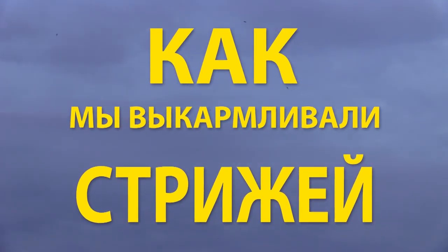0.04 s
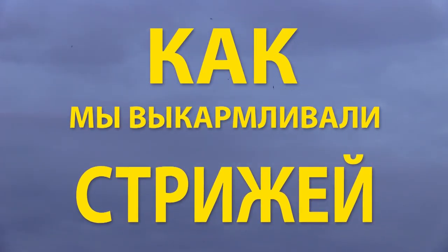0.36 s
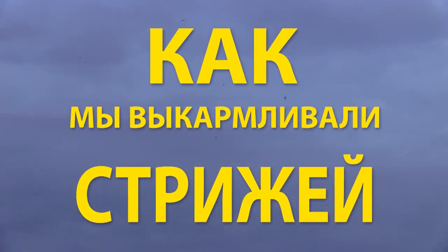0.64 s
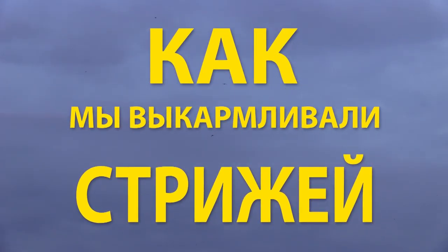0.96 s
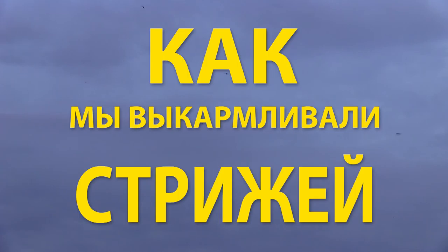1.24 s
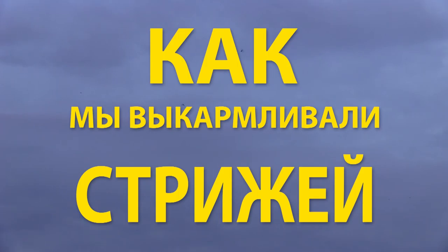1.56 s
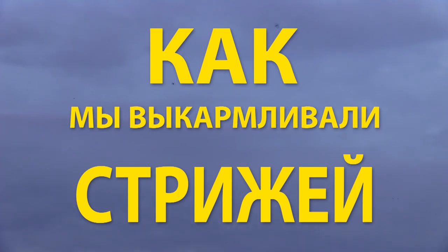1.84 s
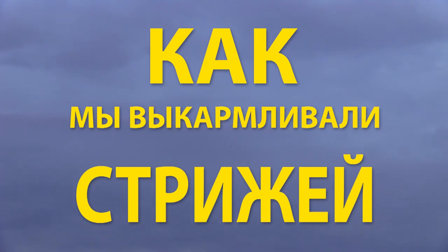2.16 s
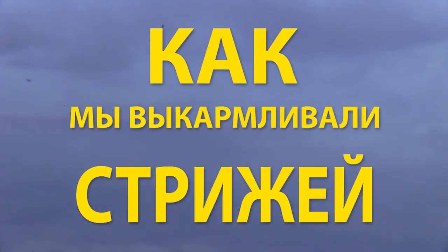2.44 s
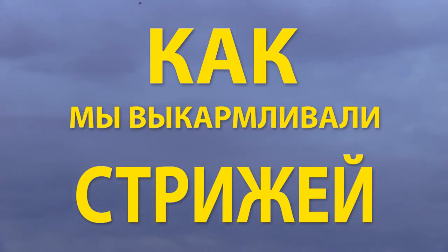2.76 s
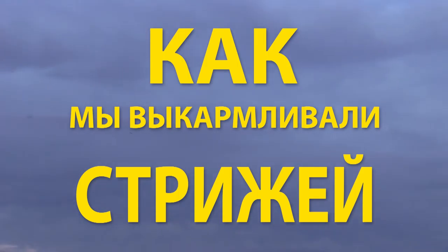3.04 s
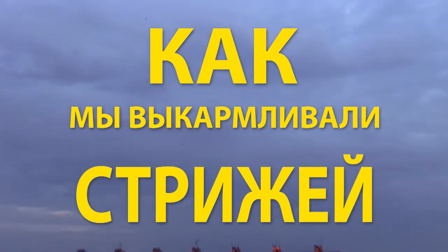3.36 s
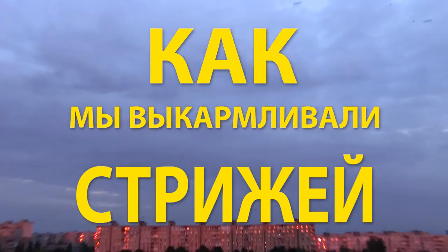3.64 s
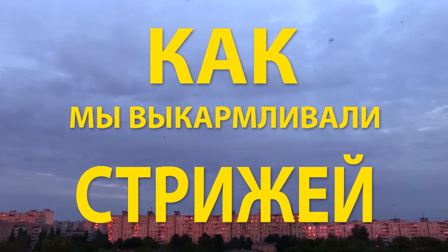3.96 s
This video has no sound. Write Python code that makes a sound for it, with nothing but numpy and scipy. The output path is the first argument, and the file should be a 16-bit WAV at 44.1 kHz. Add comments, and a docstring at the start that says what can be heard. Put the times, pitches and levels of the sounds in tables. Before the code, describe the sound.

Swifts scream overhead throughout, their shrill whistles sliding up and breaking into buzzes and quick trills, lightly echoed by houses. The loudest calls come between 0.5 and 1.3 seconds; fainter ones follow, swelling again around 3 seconds. Distant traffic rumbles underneath, with faint hiss and slowly growing wind on the microphone. The camera clicks once at the start and twice near 3.7 to 3.8 seconds.

```python
"""Swifts over a town at dusk

Swifts chase each other, heard from a hand-held camera high on a house. Each scream slides up to
a shrill whistle and breaks into a buzz; many end in a trill of short notes. House walls echo the birds.
Distant traffic rumbles, air brushes the faintly hissing microphones and the camera clicks three times."""
import sys
import numpy as np
from scipy import signal
from scipy.fft import rfft, irfft
from scipy.io import wavfile
from scipy.ndimage import uniform_filter1d

SR = 44100
rng = np.random.default_rng(int(sys.argv[2]) if len(sys.argv) > 2 else 0)


def generate_wav(signal):
    """Clip the signal to [-1, 1] and save it as 16-bit WAV at the path in sys.argv[1]."""
    frames = np.transpose(np.atleast_2d(signal))
    scaled = np.clip(frames, -1, 1) * 32767
    pcm = np.round(scaled).astype(np.int16)
    wavfile.write(sys.argv[1], SR, pcm)


N = 176400
SIDES = np.array([[1], [-1]])  # adds to the left channel, takes from the right


def undb(db):
    """Turn decibels into a number to multiply by."""
    return 10 ** (np.asarray(db) / 20)


def wander(rate_hz, size):
    """A smooth random drift with a spread of 1; a higher rate drifts faster."""
    width = max(2, int(SR / rate_hz))
    drift = rng.standard_normal(N + size)
    for _ in range(2):
        drift = uniform_filter1d(drift, width, mode="wrap")
    return drift[:size] / drift.std()


def noise(spectrum):
    """Noise with a spread of 1, shaped by (frequency [Hz], level [dB]) points and fading above the last."""
    hz, db = np.array(spectrum, float).T
    freqs = np.maximum(np.arange(N // 2 + 1) * SR / N, 1)
    gain = undb(np.interp(np.log(freqs), np.log(hz), db)) * np.minimum(1, hz[-1] / freqs) ** 2
    shaped = irfft(rfft(rng.standard_normal(N)) * gain, N)
    return shaped / shaped.std()


def add(out, start, sound):
    """Mix a sound in at its start time, in seconds."""
    i = max(0, int(start * SR))
    n = min(sound.shape[-1], N - i)
    out[..., i:i + n] += sound[..., :n]


def traffic():
    """Distant traffic blends into a low rumble that gently swells and sinks."""
    # the rumble both ears share (frequency [Hz], level [dB])
    shared = [(25, -5), (50, -7), (85, -9), (115, -0.5), (146, -1.5), (170, -7.5), (225, -7), (275, -5.5),
              (320, -11.5), (560, -11), (700, -16), (1300, -22), (2500, -31), (3500, -37.5)]
    # the part that differs between the ears (frequency [Hz], level [dB])
    spread = [(40, -18), (150, -5.5), (560, -0.5), (1300, -7.5), (3500, -20.5)]
    rumble = undb(-41) * noise(shared) + undb(-52) * SIDES * noise(spread)
    return rumble * undb(wander(1.09, N))


def wind():
    """Slowly growing gusts brush the two microphones and push them partly in opposite directions."""
    # air buffeting a microphone (frequency [Hz], level [dB])
    buffeting = [(12, 0.5), (65, -2.5), (110, -18), (250, -23), (1000, -47)]
    growth_db_per_s, gust_db = 2, 3
    db = -43.5 + growth_db_per_s * np.arange(N) / SR
    gusts = np.array([noise(buffeting) * undb(db + gust_db * wander(11, N)) for _ in range(2)])
    return gusts - 0.2 * gusts[::-1]


def microphone_hiss():
    """The microphones make a faint, steady hiss of their own."""
    # tone of the hiss (frequency [Hz], level [dB])
    hiss = [(2000, -16.5), (3500, -8), (5600, -2.5), (7600, -14), (8500, -4), (9800, 2.5), (11000, -4),
            (12500, -14.5), (15500, -16.5)]
    return undb(-52.5) * (noise(hiss) + 0.41 * SIDES * noise(hiss))


def whistle(hz, loudness, octave_db):
    """A bird's voice box sings a tone with two overtones. Returns the sound and its loudness curve."""
    phase = 2 * np.pi * np.cumsum(hz) / SR
    roughness = 2 * np.pi * np.cumsum(260 * wander(1410, len(hz))) / SR
    overtones = np.sin(2 * phase) + undb(-15.5) * np.sin(1.5 * phase + roughness)
    tone = np.sin(phase) + undb(octave_db) * overtones
    return np.array([np.sqrt(2) * loudness * tone, loudness])


def trills():
    """Each short note swells quickly, flicks on to its pitch and leaves a brief buzz."""
    # each trill: (flick starts above the pitch by [Hz], note length at 6 kHz [s], buzz level [dB]),
    # then its notes (time [s], relative level [dB], pitch [Hz])
    runs = [ ((730, 0.0058, -5.5), [(.0004, -16, 6394), (.0094, -16.5, 6510), (.0253, -21, 6130),
            (.0393, -18, 6370), (.0534, -16.5, 5950), (.0697, -28, 5740), (.0854, -22.5, 5610),
            (.1004, -33.5, 4900)]), ((400, 0.0048, 0.5), [(.8524, -27, 6200), (.8809, -25.5, 6330),
            (.9083, -25.5, 6270)]), ((420, .008, -11), [(.9418, -20.5, 5490), (.9544, -20.5, 5590),
            (.9692, -20, 5570), (.9824, -19, 5460), (.9974, -20.5, 5380), (1.0124, -22.5, 5270),
            (1.0291, -20.5, 5300), (1.0424, -23.5, 5020), (1.0584, -31, 4620)]), ((120, 0.0072, -3.5),
            [(1.2605, -18.5, 6190), (1.2885, -19, 6270), (1.3189, -21.5, 6190), (1.3485, -23.5, 5950)]),
            ((100, 0.014, -10), [(1.7874, -43, 5560), (1.8223, -41, 4890)]), ((170, 0.01, -2),
            [(2.4538, -38, 5530), (2.4824, -42, 5600), (2.5117, -35.5, 5190), (2.5404, -41, 4770)]),
            ((-450, 0.0061, -27), [(3.0915, -25, 5620), (3.116, -17.5, 5850), (3.143, -18, 5890),
            (3.1705, -23, 5640), (3.1995, -27, 5040)]), ((200, 0.009, -9), [(3.6364, -34, 4850),
            (3.6526, -32, 4990), (3.6656, -31, 5180), (3.6774, -34, 5310), (3.693, -32.5, 5150)]),
            ((700, 0.0064, -14), [(3.707, -40, 4020), (3.7209, -38, 3840), (3.7364, -42, 3700)])]
    # strength of the overtone an octave up (note pitch [Hz], level [dB])
    octaves = [(5000, -26), (5450, -8), (5800, -21.5), (6250, -8.5), (6700, -41)]
    rise_s, release_s, flick_s, rough_hz = 0.0019, 0.00038, 0.0015, 70.6
    buzz_hz, buzz_fade_s = 262, 0.017
    out, t = np.zeros((2, N)), np.arange(SR // 20) / SR
    swell = np.sin(np.pi / 2 * np.minimum(t / rise_s, 1)) ** 2
    for (flick, length, buzz_db), notes in runs:
        for start, db, pitch in notes:
            after = np.maximum(t - length * (pitch / 6000) ** 1.22, 0)  # lower notes end sooner
            buzz = undb(buzz_db) * np.exp(-after / buzz_fade_s) * np.sin(np.pi * buzz_hz * after) ** 2
            loudness = swell * (np.exp(-after / release_s) + buzz) * undb(db - 4.5)
            hz = pitch + flick * np.exp(-t / flick_s) + rough_hz * wander(1500, len(t))
            octave_db = np.interp(pitch, *np.array(octaves).T)
            add(out, start, whistle(hz, loudness, octave_db))
    return out


def beak_air(loudness):
    """Air hisses through the beak, as strongly as the bird sings."""
    # tone of the rushing air (frequency [Hz], level [dB])
    breath = [(3000, -14.5), (4300, -18), (5200, -2.5), (7000, -7.5), (9600, -5), (11500, -15),
              (15000, -19)]
    return undb(-21.5) * loudness * noise(breath)


def house_echoes(sound):
    """A near wall scatters the sound at once; far house fronts add a longer, duller tail."""
    t = np.arange(SR) / SR
    wall_fade_s, tail_s, dull_hz = 0.014, 0.69, 7640  # the tail falls 60 dB in tail_s

    def scatter(fade):
        echo = (rng.standard_normal(SR) + 0.62 * SIDES * rng.standard_normal(SR)) * fade
        return echo / np.sqrt(np.sum(echo ** 2) / 2)

    near = scatter(np.exp(-t / wall_fade_s) * (t > .002))
    far = scatter(1000. ** (-t / tail_s) * (t > .02))
    far = signal.sosfilt(signal.butter(2, dull_hz, fs=SR, output="sos"), far)
    echoes = undb(-4) * near + undb(-7.5) * far
    return sound + signal.fftconvolve(sound[None], echoes, axes=1)[:, :N]


def camera_clicks():
    """Each click ticks and rings the camera body; the ring reaches the left microphone a little late."""
    # the clicks (time [s], peak of the ring [dB], delay on the left [s], tick against ring [dB])
    clicks = [(0.012, -19.5, 0.00013, -5.5), (3.699, -25, 0.00021, -26), (3.802, -17, 0.00022, -14)]
    # ringing tones of the camera body (pitch [Hz], level [dB], time to fall 60 dB [s])
    body = [(1129, 2, 0.038), (1390, 0, 0.028), (1543, 0.5, 0.025), (2007, 1, 0.023), (2430, -5.5, 0.018)]
    # tone of the bright tick (frequency [Hz], level [dB])
    tick_tone = [(600, -12), (850, 9), (3300, -2.5), (5000, -19), (9500, 1), (12500, -1), (14000, -16)]
    ring_rise_s, tick_fade_s = 0.0012, 0.0037
    out, t = np.zeros((2, N)), np.arange(SR // 10) / SR
    for start, db, delay, tick_db in clicks:
        age = np.maximum(t - np.array([[delay], [0]]), 0)
        ring = sum(undb(level) * np.sin(2 * np.pi * hz * age) * 1000. ** (-age / ring_s)
                   for hz, level, ring_s in body)
        ring *= np.minimum(age / ring_rise_s, 1)
        tick = np.array([noise(tick_tone)[:len(t)] for _ in range(2)]) * np.exp(-t / tick_fade_s)
        add(out, start, undb(db) * (ring / abs(ring).max() + undb(tick_db) * tick))
    return out


def screams():
    """The pitch slides up and mostly sags; a fast buzz chops and bends it, unevenly in hoarse birds."""
    # the screams (start [s], end [s], first pitch [Hz], held pitch [Hz], slide time [s], final sag [Hz],
    # starting buzz rate [Hz], hoarseness [0-1], octave overtone [dB])
    calls = [ (0.158, 0.474, 4490, 6350, 0.048, 87.5, 225, 0.68, -26),
             (0.427, 0.871, 4750, 6897, 0.048, 259.5, 270.7, 0.09, -15),
             (.677, 0.816, 4900, 5460, 0.011, 445, 253.5, 0.93, -11),
             (.825, 0.942, 5060, 5550, .02, 203, 256.3, 0.7, -11),
             (1.09, 1.258, 5336, 6614, .031, 380.5, 242, 0.1, -10),
             (1.378, 1.85, 4480, 6070, 0.045, 470, 251.3, 0.39, -15.5),
             (1.833, 2.134, 5300, 6010, 0.04, 82, 211, 1, -35),
             (2.247, 2.527, 4454, 5640, 0.045, 121, 239.5, 0.56, -19),
             (2.593, 2.877, 4430, 5405, .07, 64, 236, 0.7, -25),
             (2.715, 2.86, 4300, 4998, .02, 520, 251, 0.34, -25),
             (2.83, 3.084, 4548, 5492, 0.23, -92, 233, 0.4, -34),
             (3.328, 3.638, 4230, 5693, 0.14, 482.5, 242.6, 0.64, -44)]
    # how each scream's loudness and buzz depth rise and fall (time [s], level [dB], buzz depth [0-1])
    shapes = [
        [(.163, -45, 0.6), (.28, -40.5, 0.5), (.4, -43, 0.76), (.48, -52, 1)],
        [(.43, -48, .15), (.48, -33, 0.1), (.62, -27, 0.2), (.71, -31, 0.43), (.825, -28.5, 0.9), (.87, -42, 1)],
        [(.68, -38.5, .8), (.82, -44, 0.74)],
        [(.83, -34.5, 0.67), (.94, -37, .8)],
        [(1.091, -28.5, 0), (1.157, -22, 0.22), (1.186, -30, 0.37), (1.205, -20, .08), (1.228, -28.5, .45),
         (1.26, -26, .55)],
        [(1.378, -45.5, 0.2), (1.44, -42, 0.1), (1.52, -49, .3), (1.59, -40.5, .1), (1.67, -50, 0.67),
         (1.85, -50.5, 0.8)],
        [(1.83, -49.5, 0.3), (2.024, -52, 0.46), (2.13, -65, 0.6)],
        [(2.253, -55, .3), (2.277, -40.5, 0.26), (2.37, -40.5, 0.23), (2.53, -54.5, 0.93)],
        [(2.598, -52, 0.3), (2.74, -49.5, .5)],
        [(2.72, -51, .3), (2.762, -35, 0.15), (2.86, -49, 0.35)],
        [(2.83, -48.5, 0.3), (2.925, -37, 0.17), (3.02, -34.5, 0.28), (3.078, -39, 0.67)],
        [(3.33, -53, .2), (3.43, -46, 0.38), (3.48, -39.5, 0), (3.52, -46, 0.54)],
    ]
    # stretches where the buzz throbs at half its rate (start [s], end [s], depth [dB])
    throbs = [(1.133, 1.175, 7)]
    slowing, chop_db, flutter_db = 0.139, 13, 1.5
    swing_hz, rasp_hz, hoarse_hz, waver_hz = 526, 137, 105, 18.9
    fade_in_s, fade_out_s = 0.01, 0.011
    out = np.zeros((2, N))
    for (start, end, first, held, slide, sag, rate, hoarse, octave_db), shape in zip(calls, shapes):
        t = np.arange(int((end - start) * SR)) / SR
        n, progress, clock = len(t), t / t[-1], start + t
        times, levels, depths = np.array(shape).T
        depth = np.interp(clock, times, depths)
        jitter = (0.045 + 0.065 * hoarse) * wander(198, n)
        buzz_phase = 2 * np.pi * np.cumsum(rate * (1 - slowing * progress ** 2 + jitter)) / SR

        throb_db = sum(db * ((clock > on) & (clock < off)) * 1. for on, off, db in throbs)
        dip_db = chop_db * depth * (1 - np.cos(buzz_phase)) / 2
        dip_db += uniform_filter1d(throb_db, size=300) * (1 - np.cos(buzz_phase / 2)) / 2
        chop = undb(3 * hoarse * wander(360, n) - dip_db)
        chop /= np.sqrt(uniform_filter1d(chop ** 2, size=700))  # keeps the average power steady

        hz = held + (first - held) * np.exp(-t / slide) - sag * progress ** 2 + waver_hz * wander(69, n)
        roughness = rasp_hz * wander(2000, n) + hoarse * hoarse_hz * wander(380, n)
        hz += depth * (swing_hz * np.cos(buzz_phase + 1.57) + roughness)

        db = np.interp(clock, times, levels) + flutter_db * wander(125, n)
        fade = np.clip(np.minimum(t / fade_in_s, (t[-1] - t) / fade_out_s), 0, 1)
        add(out, start, whistle(hz, chop * fade * undb(db), octave_db))
    return out


def swifts():
    """All the birds with their breath and echoes, a little to the left."""
    voices, loudness = screams() + trills()
    left_lead_db = 0.9
    return house_echoes(voices + beak_air(loudness)) * undb(SIDES * left_lead_db / 2)


def scene():
    """Birds, camera, town and air together."""
    return swifts() + camera_clicks() + traffic() + wind() + microphone_hiss()


def record(dry):
    """A steep filter cuts off the highest treble."""
    top_hz = 15750
    return signal.sosfilt(signal.ellip(10, .1, 80, top_hz, fs=SR, output="sos"), dry)


dry = scene()
out = record(dry)
generate_wav(out)
```